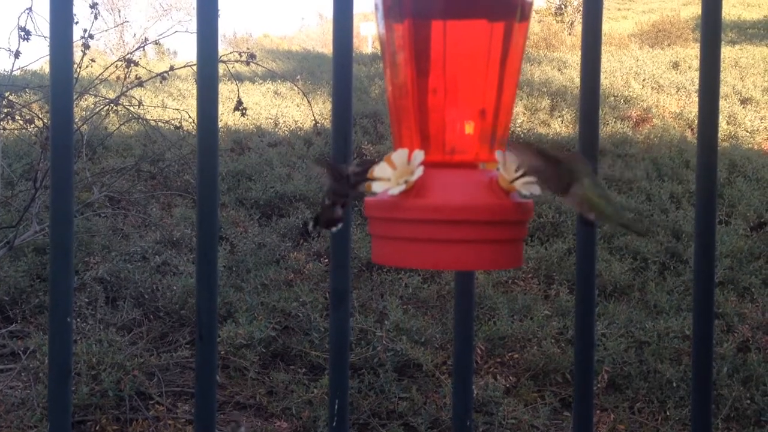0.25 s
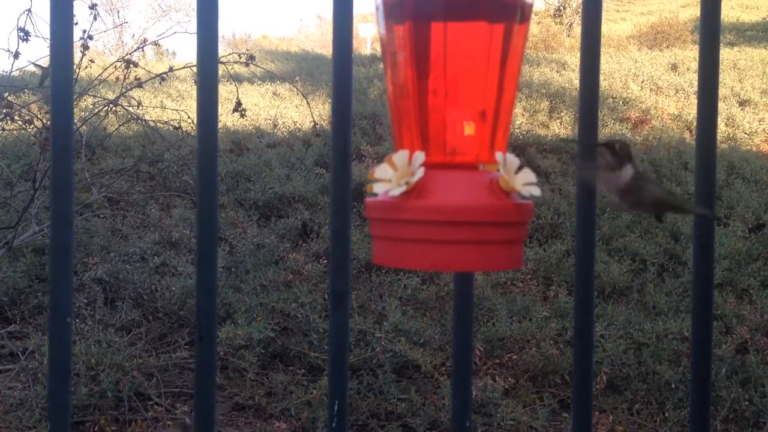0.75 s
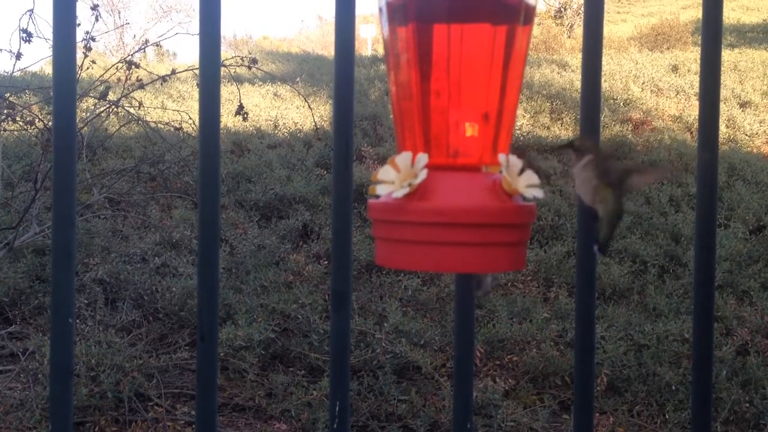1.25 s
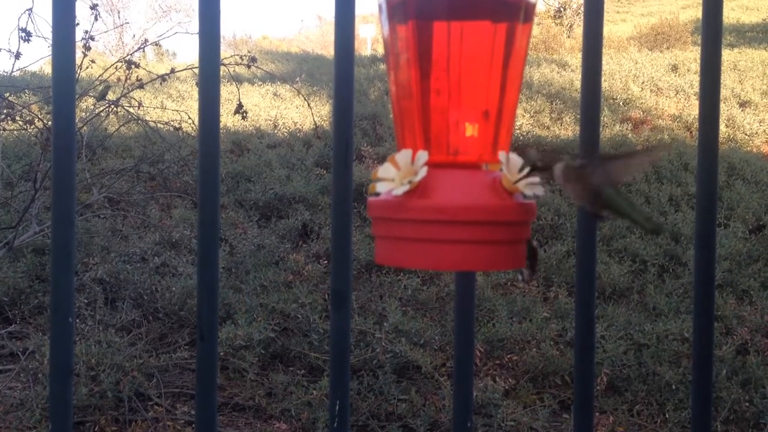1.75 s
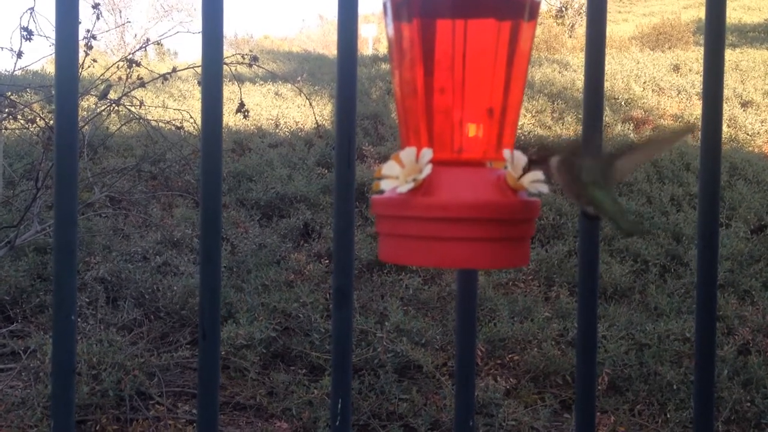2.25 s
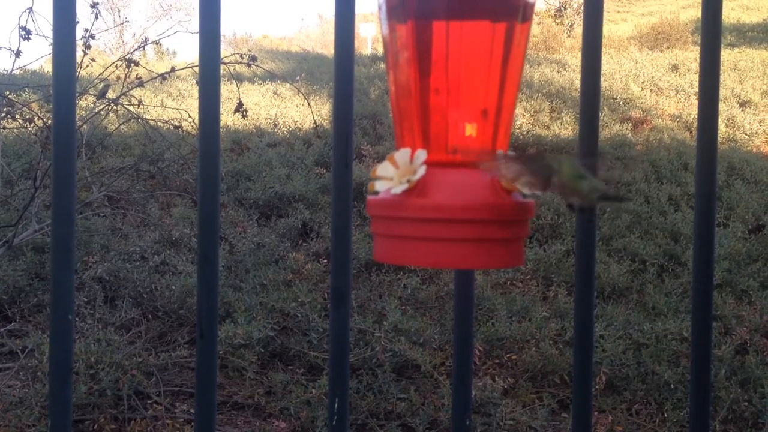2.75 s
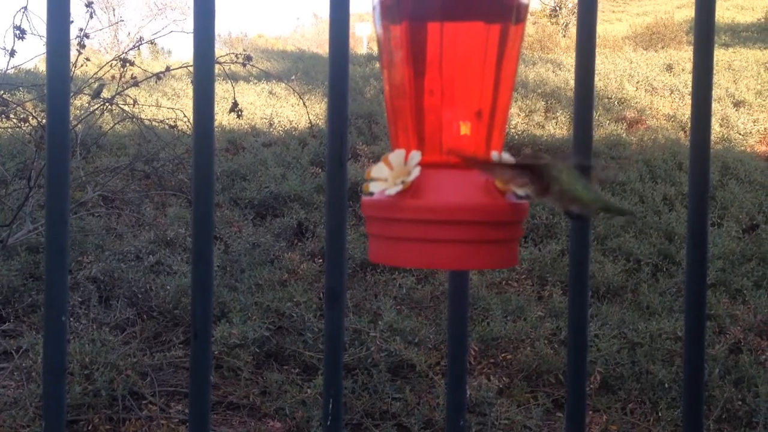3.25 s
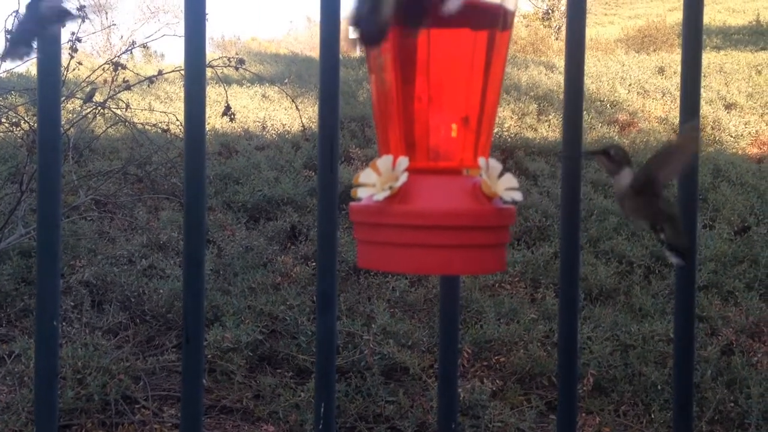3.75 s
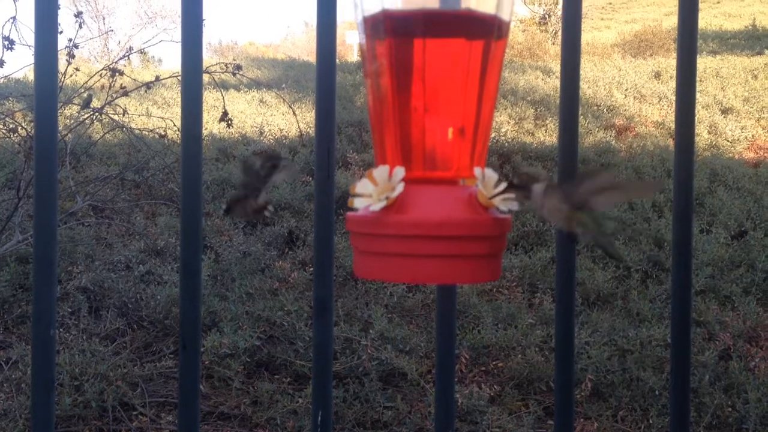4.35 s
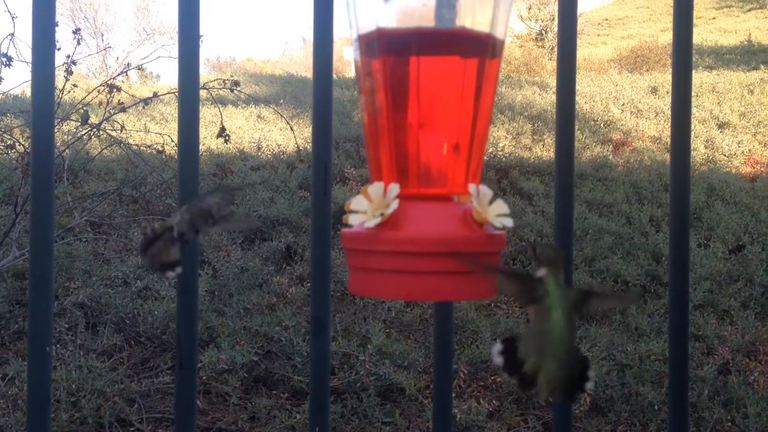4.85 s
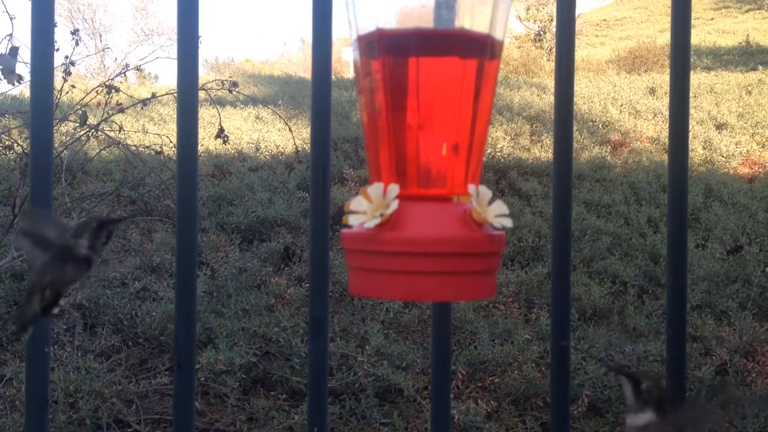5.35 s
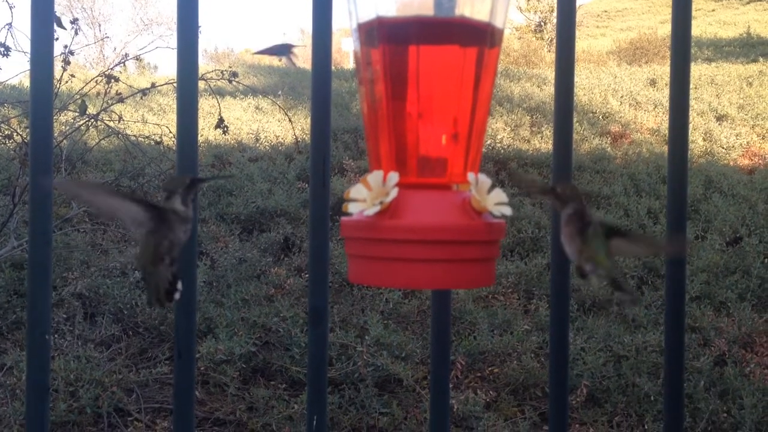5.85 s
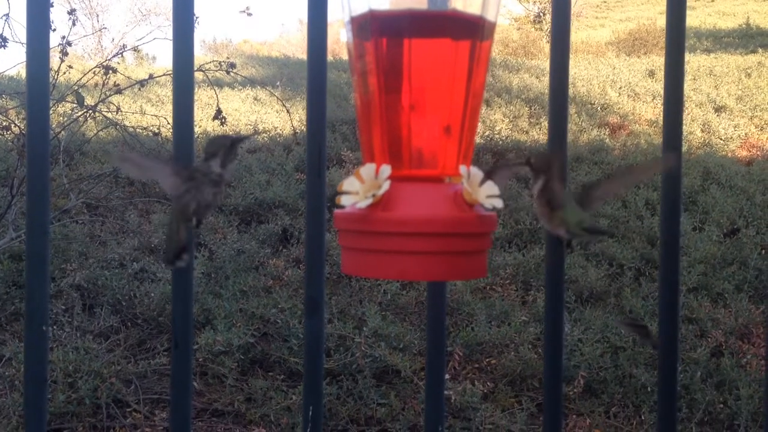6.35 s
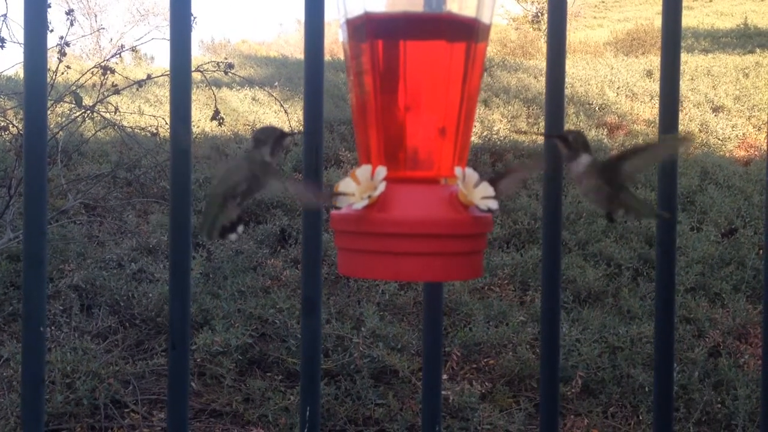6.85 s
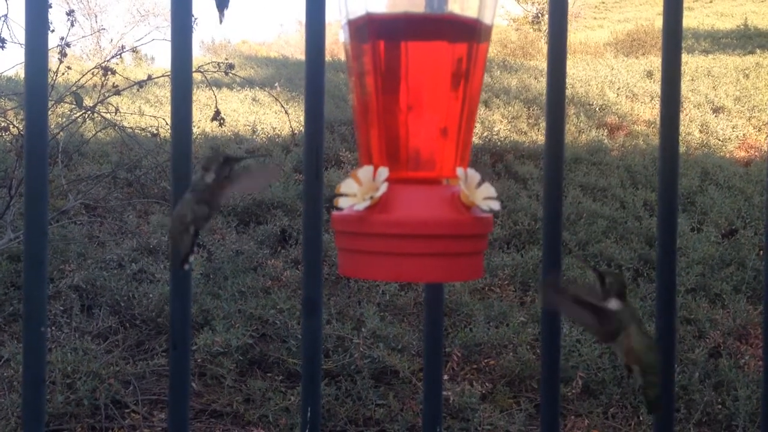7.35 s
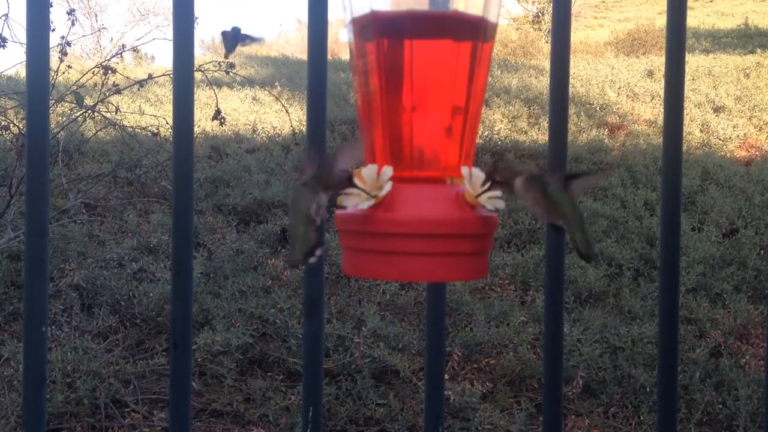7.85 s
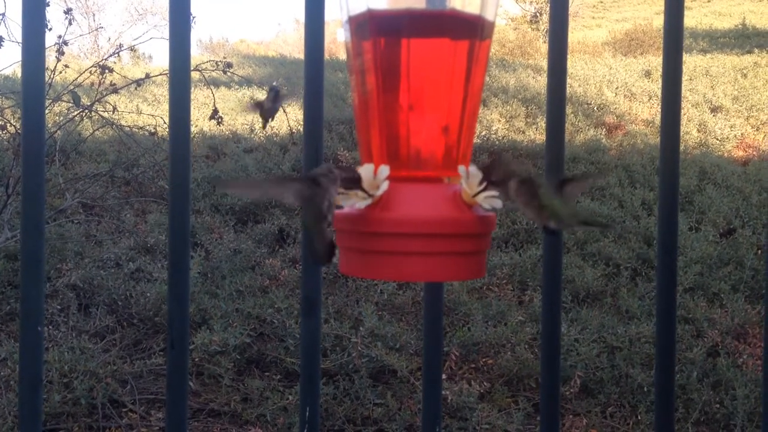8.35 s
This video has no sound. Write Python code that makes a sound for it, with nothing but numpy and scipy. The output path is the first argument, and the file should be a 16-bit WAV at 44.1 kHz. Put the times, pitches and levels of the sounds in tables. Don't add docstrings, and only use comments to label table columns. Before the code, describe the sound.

A close outdoor phone pickup of hummingbirds at a feeder, over faint garden hiss. Throughout, two low wing hums, roughly 40 and 50 beats per second, purr and swell unevenly with soft downwash and feather rustle. A tiny high warble opens at 0.1 s; a chip and wing thumps come near 0.7. From 1 to 3 s, faint warbles, little reedy scolds and sparse rising chips. At 3.6-3.75 heavy braking thuds, sharp ticks and chips, then a rapid piercing trill at 4.0 with a faint buzz. More chips and flutters until a second trill at 5.1, a louder raspy buzz at 5.24 and falling, brassy chatter from 5.4 to 5.8 amid the strongest wing thumps. Bright warbles and shivering twitters follow at 6.0-6.7, a chip at 6.85, flutters around 7.2-7.5, then chips to 7.85 and faint scolds and distant calls over softening hum until 8.6. Calls leave a short bright echo.

```python
import sys
import numpy as np
from scipy import signal
from scipy.fft import rfft, irfft
from scipy.io import wavfile
from scipy.ndimage import uniform_filter1d, minimum_filter1d

SR = 44100
rng = np.random.default_rng(int(sys.argv[2]) if len(sys.argv) > 2 else 0)


def boost_factor(decibels):
    exponent = np.asarray(decibels, float) / 20
    return 10 ** exponent


def put_to_file(sound):
    columns = np.atleast_2d(sound).T
    safe = np.clip(columns, -1, 1)
    whole_steps = np.round(safe * 32767)
    wavfile.write(sys.argv[1], SR, whole_steps.astype(np.int16))


N = 379701

# (time [s], stroke rate [Hz], hum level [dB])
QUICK_WINGS = [(0, 48.3, -57), (.62, 52.8, -55), (.78, 44.2, -47.5), (.95, 54.8, -59), (2, 49.2, -58),
               (2.4, 56.5, -54), (3.5, 48.5, -62.5), (3.65, 51, -62), (4.35, 50, -55.5), (4.48, 50, -56),
               (4.65, 51, -73), (5.25, 54.4, -53.5), (5.6, 49, -57.5), (6.8, 46, -65.5), (7.4, 51, -52),
               (7.6, 50.3, -58), (8.15, 52, -58), (8.61, 48.3, -59.5)]
SLOW_WINGS = [(0, 42.23, -64.5), (.3, 40.73, -54), (.5, 42.24, -60), (1.2, 44.98, -58.5),
              (2.3, 42.11, -60.5), (3.3, 40.44, -53), (3.52, 41.07, -57.5), (3.65, 43, -45),
              (4, 40.36, -52.5), (4.62, 38.03, -54), (4.9, 39.96, -52.5), (5.25, 44.42, -47),
              (5.7, 43.34, -59.5), (6.3, 42.52, -53), (7, 40.89, -57), (7.2, 45.4, -52), (7.45, 45.86, -63),
              (8.61, 43.16, -68)]
QUICK_PARTIALS = [-13, -4.5, -2.5, -4, -11.5, -15, -17, -19, -25, -21.5, -24.5, -30]
SLOW_PARTIALS = [-11.5, -0.5, -5, -4, -9.5, -17, -25, -21, -27.5, -33]
# (time [s], level [dB])
STIR = [(0.0, -70.5), (0.6, -69), (1.34, -75), (2.54, -71), (3.55, -74), (3.67, -66.5), (4.41, -72.5),
        (4.77, -72.5), (5.32, -62.5), (5.51, -64.5), (5.7, -73.5), (6.88, -73), (7.18, -69.5),
        (7.45, -65.5), (7.7, -77), (8.08, -69), (8.61, -76.5)]
# (frequency [Hz], level [dB])
WASH_COLOUR = [(25, -18), (40, -5), (60, 2.5), (100, 5), (200, 2.5), (300, -6), (450, -9.5), (700, -23),
               (1200, -44.5)]
# (frequency [Hz], level [dB])
RUSTLE_COLOUR = [(500, -2), (900, 2), (2000, 0), (2750, -6), (3700, -0.5), (6000, -10), (12000, -14)]
# (frequency [Hz], density [dB per Hz])
GARDEN_COLOUR = [(180, -35), (300, 0.5), (366, -4.5), (697, -18), (1000, -13.5), (1140, -14.5), (1670, -12),
                 (2750, -20.5), (3640, -16), (8190, -18.5), (11000, -20), (14600, -19.5), (15600, -23)]
# (time [s], length [s], centre [Hz], level [dB])
FAR_CALLS = [(0.0, 0.013, 7840, -56.5), (0.178, 0.046, 6550, -58.5), (0.263, 0.021, 6540, -58),
             (0.588, 0.0042, 3980, -59), (1.188, 0.037, 3500, -64), (1.493, 0.0066, 3960, -60.5),
             (2.736, 0.016, 6500, -60), (2.903, 0.015, 6510, -60), (3.144, 0.011, 5945, -56.5),
             (3.238, 0.019, 5270, -60), (3.303, 0.028, 6500, -61), (3.375, .015, 6000, -63.5),
             (3.617, 0.0078, 3980, -64), (3.742, 0.0045, 4000, -53), (3.744, .0015, 3500, -45.5),
             (4.004, .0015, 4000, -52), (3.752, .0015, 3300, -57), (.005, .0015, 3700, -54),
             (1.373, 0.0013, 3800, -54), (1.386, .0012, 3800, -56), (1.405, .0012, 4200, -60),
             (6.43, .0012, 3800, -60), (6.451, .0012, 3800, -59), (6.47, .0012, 3800, -58),
             (7.188, 0.0014, 3700, -52), (7.2, .0015, 3900, -60), (7.22, .0015, 3700, -57),
             (7.286, .0012, 4100, -60), (3.799, 0.0036, 4000, -53), (3.817, .004, 4020, -59),
             (5.086, 0.0035, 2600, -50), (5.176, 0.0048, 3600, -45), (4.824, 0.023, 3000, -60),
             (5.643, .0012, 3800, -48), (5.664, .0012, 3800, -53), (6.896, 0.0077, 4500, -55.5),
             (7.165, 0.042, 3690, -58.5), (7.166, 0.0089, 3350, -54.5), (7.21, 0.0089, 3700, -59),
             (7.523, 0.011, 3715, -64), (7.164, 0.035, 1908, -57), (7.617, 0.027, 7000, -61.5),
             (8.013, 0.038, 5995, -59), (8.076, 0.031, 6900, -57), (8.137, 0.034, 7000, -69),
             (8.233, 0.059, 6490, -63.5)]
# (time [s], length [s], one swing [s], top [Hz], level [dB])
WARBLES = [
    (0.08, 0.024, 0.024, 10510, -35),
    (2.377, 0.022, 0.023, 10570, -41),
    (1.61, 0.099, 0.022, 11040, -47),
    (2.204, 0.083, 0.023, 10980, -44),
    (6.036, 0.0792, 0.0236, 11230, -31),
    (6.5593, 0.033, 0.027, 10900, -32),
    (6.679, 0.037, 0.025, 10810, -30.5),
]
# (time [s], length [s], from [Hz], to [Hz], level [dB])
CHIPS = [(0.685, 0.01, 5430, 8850, -33.5), (1.357, 0.016, 5300, 10350, -41),
         (1.796, 0.015, 5670, 9600, -50.5), (2.293, 0.01, 7000, 8610, -51.5),
         (2.662, 0.012, 6200, 9720, -40.5), (2.947, 0.013, 5840, 8940, -42),
         (3.097, 0.013, 5200, 9060, -38.5), (3.636, 0.011, 5860, 9240, -45.5),
         (3.7843, 0.0091, 5735, 8700, -39), (3.916, 0.016, 5474, 9280, -34),
         (4.3282, 0.014, 5215, 9280, -34), (4.475, 0.011, 5370, 8950, -33),
         (4.91, 0.011, 5364, 8830, -35.5), (5.041, 0.011, 5290, 8975, -33.5),
         (5.939, 0.014, 5530, 9480, -32.5), (6.126, 0.006, 6590, 8700, -40),
         (6.844, 0.011, 6170, 9426, -32.5), (7.386, 0.014, 5300, 10010, -34),
         (7.8453, 0.0084, 5795, 8590, -38.5)]
# (time [s], peak level [dB], frequency [Hz])
FLAPS = [(.739, -33, 119), (0.76, -31, 119), (0.776, -30, 140), (.796, -30.5, 202), (0.836, -37.5, 109.9),
         (2.281, -33, 172), (2.385, -31, 100), (3.605, -24.5, 94.8), (3.628, -32, 110), (3.64, -26.5, 129),
         (3.659, -25.5, 215), (3.678, -27, 222), (3.699, -30, 224), (3.792, -43, 900), (7.208, -44, 800),
         (3.729, -23.5, 150), (3.75, -26.5, 160), (3.933, -36, 99.8), (4.206, -35, 120),
         (4.445, -32, 202.3), (4.465, -29.5, 200), (4.486, -32, 222), (4.506, -38, 201.5),
         (4.759, -38, 119.5), (4.867, -30.5, 199), (4.889, -28.5, 168), (5.071, -38, 130),
         (5.165, -27, 194), (5.186, -30.5, 142), (5.206, -37, 109.7), (5.231, -33, 141.3),
         (5.286, -30.5, 100), (5.297, -32, 130.6), (5.337, -29, 151), (5.414, -34, 179.8),
         (5.557, -23, 143), (5.572, -21, 296.4), (5.608, -24, 175.4), (5.811, -24, 258.3),
         (5.845, -34.5, 199.8), (5.887, -37, 170.6), (5.902, -29, 149.8), (5.966, -38, 150.8),
         (6.361, -33.5, 64.8), (6.375, -35.5, 198.9), (7.189, -35, 167.3), (7.215, -33, 170),
         (7.376, -46, 805), (7.396, -47, 796), (7.417, -43, 951), (7.438, -42, 1001), (7.459, -39.5, 950),
         (7.48, -45, 900)]
# (time [s], length [s], from [Hz], to [Hz], level [dB])
SCOLDS = [
    (1.049, 0.024, 1960, 1497, -54.5),
    (2.248, 0.022, 1940, 1435, -56),
    (2.268, 0.025, 1900, 1594, -53),
    (4.54, 0.025, 1977, 1586, -53.5),
    (4.825, 0.025, 2390, 1630, -61.5),
    (5.28, 0.024, 1905, 1475, -53.5),
    (7.553, 0.022, 2170, 1446, -60),
]
# (time [s], length [s], from [Hz], to [Hz], level [dB])
SCOLDS_AWAY = [(1.19, 0.015, 1895, 1688, -58), (1.213, 0.0095, 2000, 1900, -61),
               (1.496, 0.011, 1789, 1760, -67), (2.062, 0.026, 2450, 1534, -59),
               (3.618, .011, 2500, 1500, -63), (2.703, 0.021, 2440, 1583, -52),
               (6.533, 0.011, 2335, 1584, -58), (6.903, 0.034, 1944, 1462, -59),
               (7.381, 0.0108, 2240, 1770, -56), (7.666, 0.018, 2240, 1646, -57.5),
               (7.887, 0.012, 2570, 1651, -59.5), (8.498, 0.017, 2298, 1721, -57.5)]
# (frequency [Hz], level [dB])
THROAT = [(1300, -5), (2300, 7.5), (2900, -2), (3900, 4), (5600, 4.5), (7700, -2), (10000, -13.5),
          (15000, -16)]
# (time [s], dip [Hz], level [dB])
TRILLS = [
    [(3.986, 6850, -32), (3.9995, 6230, -28), (4.0119, 5490, -29.5), (4.0251, 5020, -33),
     (4.0381, 5670, -30.5), (4.0496, 5560, -33.5), (4.0646, 5030, -35.5), (4.0798, 5600, -36),
     (4.0955, 5810, -42), (4.102, 5930, -51)],
    [(5.0642, 6550, -45), (5.0745, 5100, -37), (5.0869, 6146, -39.5), (5.1012, 5500, -32),
     (5.1141, 5350, -31.5), (5.1271, 4900, -31.5), (5.1401, 4807, -32), (5.1528, 4085, -34),
     (5.1658, 4100, -37.5), (5.18, 2870, -48), (5.184, 5900, -62), (5.1915, 5900, -47), (5.197, 3500, -55)],
]
# (frequency [Hz], level [dB])
TRILL_RASP = [(7800, -40), (8800, -4), (13400, 5), (14000, -40)]
# (time [s], length [s], from [Hz], to [Hz], swing [Hz], level [dB])
BUZZES = [
    (4.1, 0.045, 5780, 4670, 930, -46),
    (5.238, .047, 4980, 4300, 1240, -35.5),
]
BUZZ_AIR_DB = [-13, -5]
# (time [s], length [s], from [Hz], pause [1 none - 6 long], level [dB])
CHATTER_HOOKED = [
    (5.371, 0.032, 4554, 3, -42),
    (5.678, 0.028, 4420, 1.5, -50),
    (5.777, 0.03, 4100, 1.4, -47),
]
# (time [s], length [s], from [Hz], pause [1 none - 6 long], level [dB])
CHATTER = [
    (5.438, 0.031, 4300, 5, -43.5),
    (5.510, 0.032, 4700, 1.7, -44),
    (5.588, 0.033, 4150, 4, -47.5),
]
# (frequency [Hz], level [dB])
BEAK = [(1500, 0), (1950, 2), (2350, 12), (2800, -3), (3700, 6), (5600, 9), (7400, 7), (9500, -4),
        (15000, -21)]
# (time [s], rise [s], from [Hz], shiver [s], level [dB])
TWITTERS = [
    (6.2197, 0.0074, 5124, 0.01693, -33.5),
    (6.315, 0.0074, 8260, 0.0107, -30),
]

OCTAVE_DB, ROUGH_DB = -27, 1.5
TOP_THIN_DB, LOW_THIN_DB = -2.5, -11.5
SWEEP_HZ_PER_S, TOP_SAG_HZ_PER_S = 200500, 5000
RISE_SHARE, LAST_REACH = 0.63, 0.66
SLOW_SWING_S = 0.0225
FIRST_LEAN, FIRST_DELAY = 0.256, 1.45
WARBLE_START_DB, FALL_DB, LAST_DB = -13, -5.5, -5
ROUGH_PER_DB = 0.1086
FULL_VOICE_HZ, WEAK_DB_PER_KHZ, CHIP_OCTAVE_DB = 7000, 9, -15.5
HELD_HZ, HELD_SAG_HZ, HELD_SAG_S = 6714, 700, 0.0147
HOOK_HZ, FALL_HZ_PER_S, PAUSE_HZ, END_HZ = 3850, 182000, 1880, 1380
OPEN_DB, OPEN_SHARE, CLOSE_DB = -9, 0.35, -2
TURNS_S, TURN_DB_PER_S = 5.59, -21
SHIVER_S, SHIVER_HZ, SHIVER_SWING_HZ, SHIVER_END_HZ = 0.00235, 9280, 356, 8310
SHIVER_ARCH_HZ, TWITTER_START_DB, SHIVER_FADE_DB_PER_S = 694, -21, 250
SHADOW_DB, HIGH_SHADOW_DB, HIGH_HZ, REACH_BINS = 21, 15, 11000, 101


def shape(points, hz):
    f, db = np.transpose(points)
    return boost_factor(np.interp(np.log(np.maximum(hz, 1)), np.log(f), db))


def noise(points):
    spectrum = rfft(rng.standard_normal(N + 1))
    x = irfft(spectrum * shape(points, np.fft.rfftfreq(N + 1, 1 / SR)))[:N]
    return x / x.std()


def walk(rate):
    k = int(SR / rate)
    held = np.repeat(rng.standard_normal(N // k + 1), k)
    x = uniform_filter1d(uniform_filter1d(held, k), k)[:N]
    return x / x.std()


def curve(table):
    s, *columns = np.transpose(table)
    return [np.interp(np.arange(N) / SR, s, c) for c in columns]


def add(out, s, x, attack=0.0011, release=0.0016):
    t = np.arange(len(x)) / SR
    i = int(max(s, 0) * SR)
    edges = np.clip(np.minimum(t / attack, (t[-1] - t) / release), 0, 1)
    out[i:i + len(x)] += (x * edges)[:N - i]


def whistle(hz, db, octave_db):
    phase = 2 * np.pi * np.cumsum(hz) / SR
    second = boost_factor(octave_db) * (hz < 9500) * np.sin(2 * phase)
    third = boost_factor(-38) * np.sin(3 * phase)
    return np.sqrt(2) * boost_factor(db) * (np.sin(phase) + second + third)


def swing(s, hz, db, rough, creep=False):
    turns = np.arange(len(s))
    step = np.interp(np.arange(s[0], s[-1], 1 / SR), s, turns)
    k, u = step.astype(int), step % 1
    way = (1 - np.cos(np.pi * u)) / 2
    if creep:
        shoot = (1 - np.cos(np.pi * u ** FIRST_DELAY)) / 2
        way = np.where(k, way, FIRST_LEAN * u + (1 - FIRST_LEAN) * shoot)
    pitch = np.interp(k + way, turns, hz)
    thin_db = np.where(np.round(step) % 2, TOP_THIN_DB, LOW_THIN_DB) * np.cos(np.pi * u) ** 2
    level = np.interp(step, turns - 0.35, db) + thin_db
    return whistle(pitch, level + ROUGH_DB * rough[:len(u)], OCTAVE_DB)


def wings(table, partials, wobble, uneven_db):
    hz, db = curve(table)
    phase = 2 * np.pi * np.cumsum(hz * (1 + wobble * walk(25))) / SR
    hum = sum(boost_factor(g) * np.cos((k + 1) * phase + 0.7 * k + 0.2974 * k ** 2) for k, g in enumerate(partials))
    level = db + uneven_db * walk(40) + 2.0 * walk(7.9)
    return np.sqrt(2) * boost_factor(level) * hum, phase


def downwash(braking, beat):
    hover = np.hypot(boost_factor(curve(QUICK_WINGS)[1]), boost_factor(curve(SLOW_WINGS)[1]))
    steady = boost_factor(-2) * hover * (hover / boost_factor(-52.5)) ** 0.13
    gust = boost_factor(-7) * np.sqrt(np.abs(uniform_filter1d(braking ** 2, size=int(0.042 * SR))))
    air = np.minimum(np.hypot(steady, gust), boost_factor(-46.5))
    return air * boost_factor(1.5 + 2.0 * beat + 2.55 * walk(30)) * noise(WASH_COLOUR)


def rustle(beat):
    level = curve(STIR)[0] + 4.5 + 2.5 * beat + 2.9 * walk(60)
    return boost_factor(level) * noise(RUSTLE_COLOUR)


def garden():
    return boost_factor(-64 + 0.75 * walk(1.63)) * noise(GARDEN_COLOUR)


def far_birds():
    out = np.zeros(N)
    hiss, rasp = rng.standard_normal(N), boost_factor(3.0 * walk(250))
    for s, length, hz, db in FAR_CALLS:
        width_hz = hz * (1.4 if 0.002 < length < 0.009 else 0.54)
        i, n = int(max(s, 0) * SR), int(length * SR) + 200
        limits = [max(hz - width_hz / 2, 300), hz + width_hz / 2]
        band = signal.butter(2, limits, "band", fs=SR, output="sos")
        x = signal.sosfilt(band, hiss[i:i + n]) * rasp[i:i + n]
        add(out, s, boost_factor(db) * x / x.std(), 0.003, 0.005)
    return out


def warbles():
    out, rough = np.zeros(N), walk(600)
    for s, length, period, top_hz, db in WARBLES:
        k = np.arange(round(2 * length / period) + 1)
        up, span = k % 2, SWEEP_HZ_PER_S * period
        t = np.append((period * (k // 2 + RISE_SHARE * up))[:-1], length)
        hz = top_hz - span * (1 - up) - TOP_SAG_HZ_PER_S * t * up
        hz[-1] = hz[-2] + LAST_REACH * (hz[-1] - hz[-2])
        level = db + FALL_DB * (1 - up) * (k < k[-1]) + WARBLE_START_DB * (k == 0)
        level = level + LAST_DB * (k == k[-1]) * (period > SLOW_SWING_S)
        depth = 1.5 - ROUGH_PER_DB * (db + 25.5) / 2
        add(out, s, swing(t, hz, level, depth * rough[int(s * SR):], creep=True))
    return out


def chips():
    out, rough = np.zeros(N), walk(700)
    for s, length, low_hz, top_hz, db in CHIPS:
        u = np.arange(0, 1.2, 1 / (length * SR))
        rise = np.sin(np.pi / 2 * u ** 1.57)
        start_db = WEAK_DB_PER_KHZ * (low_hz - FULL_VOICE_HZ) / 1000 - 3
        swell = start_db * np.clip(1 - u / 0.84, 0, 1) ** 1.44 - 14 * np.clip(u - 0.75, 0, 1)
        level = db + 0.5 + swell + 1.1 * rough[int(s * SR):][:len(u)]
        add(out, s, whistle(low_hz + (top_hz - low_hz) * rise, level, CHIP_OCTAVE_DB))
    return out


def flaps():
    out = np.zeros(N)
    for s, db, hz in FLAPS:
        cycles = np.arange(-1.5, 2.5, hz / SR)
        width = np.where(cycles < 0, 0.45, 0.8)
        pulse = np.sin(2 * np.pi * cycles) * np.exp(-(cycles / width) ** 2)
        add(out, s - 1.543 / hz, boost_factor(db - 2.5) * pulse)
    return out


def scolds():
    out = np.zeros(N)
    flutter, breath = np.array([walk(180) for _ in range(10)]), noise(THROAT)
    k = np.arange(1, 11)[:, None]
    for rows, upper_db in ((SCOLDS, 0), (SCOLDS_AWAY, -12.5)):
        for s, length, from_hz, to_hz, db in rows:
            u = np.arange(0, 1, 1 / (length * SR))
            here = slice(int(s * SR), int(s * SR) + len(u))
            pause = 0.035 * np.sin(2 * np.pi * u) - 0.04 * np.sin(3 * np.pi * u)
            slide = u + np.log(from_hz / to_hz) * pause
            hz = (1 + 0.015 * flutter[0, here]) / (1 / from_hz + (1 / to_hz - 1 / from_hz) * slide)
            phase = 2 * np.pi * np.cumsum(hz) / SR
            hollow_db = 4.5 if from_hz < 2050 else 1.5
            level = upper_db * np.clip(0.7 * k - 1.25, 0, 1) - hollow_db * (k == 2)
            level = level - (8.8 * u ** 2 + 0.83 * (1 - u) ** 2) * (k > 1) - 2 * (1 - u) ** 2 * (k == 1)
            level = level + np.minimum(1 + k, 4) * flutter[:, here]
            gain = shape(THROAT, k * hz) * boost_factor(level)
            voice = np.sqrt(2) * (gain * np.sin(k * phase)).sum(axis=0)
            breath_db = -1 if length < 0.0185 else upper_db / 2 - 11
            add(out, s, boost_factor(db + 2) * (voice + boost_factor(breath_db) * breath[here]), 0.006, 0.003)
    return out


def trills():
    out, rough = np.zeros(N), walk(360)
    for rows in TRILLS:
        s, dip_hz, db = np.transpose(rows)
        step = np.interp(np.arange(s[0], s[-1], 1 / SR), s, np.arange(len(s)))
        u = step % 1
        catch = np.exp(-u / 0.11) + np.exp(-(1 - u) / 0.14)
        held = HELD_HZ - HELD_SAG_HZ * np.exp(-np.arange(len(u))[::-1] / SR / HELD_SAG_S)
        pitch = held - 1.22 * catch * (held - dip_hz[np.round(step).astype(int)])
        level = db[(step + 0.12).astype(int)] + 1.0 * rough[:len(u)] - 3 * u - 1.9 * catch
        level -= 5 * (step > 1) * np.exp(-((u - 0.17) / 0.041) ** 2)
        level -= 9 * np.exp(-((u - 0.8) / 0.056) ** 2)
        octave_db = -17 + 0.3 * np.minimum(level + 38, 0) + 3 * catch + 3 * rough[::-1][:len(u)]
        note = whistle(uniform_filter1d(pitch, size=30), uniform_filter1d(level, size=40), octave_db)
        add(out, s[0], note, 0.0006)
    return out


def trill_rasp(trill):
    drive = np.sqrt(np.abs(uniform_filter1d(trill ** 2, size=400)))
    return boost_factor(-23) * drive * noise(TRILL_RASP)


def buzzes():
    out, rough = np.zeros(N), walk(900)
    hiss = noise([(2000, -38), (3500, 5.0), (9000, 1), (12000, -9), (15500, -21)])
    for (s, length, from_hz, to_hz, swing_hz, db), air_db in zip(BUZZES, BUZZ_AIR_DB):
        u = np.arange(0, 1, 1 / (length * SR))
        shake = np.cos(2 * np.pi * 229 * length * (u - 0.062 * u ** 3))
        fray = u ** 2 * rough[int(s * SR):][:len(u)]
        slide = (to_hz - from_hz) * u ** 2
        pitch = from_hz + slide + swing_hz * ((0.73 + 0.28 * u) * shake + 0.48 * fray)
        half = np.pi * np.cumsum(from_hz + 0.3 * slide + 0.3 * swing_hz * shake) / SR
        halves = boost_factor(db - 42 + 38 * u) * np.sin(half)
        halves += boost_factor(db - 15 + 5.2 * shake - 6 * u) * np.sin(3 * half)
        air = boost_factor(db + air_db * (1 - u) + 0.6 * shake) * hiss[int(s * SR):][:len(u)]
        note = whistle(pitch, db + 1.2 * shake - 3 * np.abs(fray), -13 + 5 * u)
        add(out, s, note + halves + air, 0.012, 0.006)
    return out


def chatter():
    out = np.zeros(N)
    flutter, breath = np.array([walk(180) for _ in range(10)]), noise(THROAT)
    k = np.arange(1, 11)[:, None]
    for rows, cap_hz in ((CHATTER_HOOKED, HOOK_HZ), (CHATTER, SR / 2)):
        for s, length, from_hz, pause, db in rows:
            u = np.arange(0, 1, 1 / (length * SR))
            here = slice(int(s * SR), int(s * SR) + len(u))
            fall = np.clip(from_hz - FALL_HZ_PER_S * length * u, 0, cap_hz)
            rest = END_HZ + (PAUSE_HZ - END_HZ) * (1 - u ** pause) / (1 - 0.65 ** pause)
            landing = (fall ** 9 + np.minimum(rest, 2350) ** 9) ** (1 / 9)
            hz = landing * (1 + 0.006 * flutter[0, here])
            turn_db = TURN_DB_PER_S * max(s - TURNS_S, 0)
            upper_db = OPEN_DB * np.clip(1 - u / OPEN_SHARE, 0, 1) + CLOSE_DB * u ** 5 + turn_db
            shy_db = turn_db * np.clip(1.5 - u / 0.25, 0, 1.2)
            level = (upper_db - 1.37 * k) * (k > 1) + shy_db + 3.2 * flutter[:, here]
            gain = shape(BEAK, k * hz) * (k * hz < 15500) * boost_factor(level)
            phase = 2 * np.pi * np.cumsum(hz) / SR
            voice = np.sqrt(2) * (gain * np.sin(k * phase)).sum(axis=0)
            add(out, s, boost_factor(db) * (voice + boost_factor(upper_db - 4.0) * breath[here]), 0.004, 0.004)
    return out


def twitters():
    out, rough = np.zeros(N), walk(600)
    for s, rise, from_hz, length, db in TWITTERS:
        k = np.arange(round(length / SHIVER_S) + 1)
        t = k * length / k[-1]
        arch = SHIVER_ARCH_HZ * np.sin(np.pi * t / length) * (1 - k % 2)
        shiver = SHIVER_HZ + SHIVER_SWING_HZ * (-1) ** k + arch
        hz = np.r_[from_hz, shiver[:-1], SHIVER_END_HZ]
        level = db + np.r_[TWITTER_START_DB, -SHIVER_FADE_DB_PER_S * np.abs(t - length / 3)]
        add(out, s, swing(np.r_[0, rise + t], hz, level, rough[int(s * SR):]))
    return out


def echo(x):
    t = np.arange(int(0.15 * SR)) / SR
    decay = boost_factor(-60 * t / 0.075)
    tail = rng.standard_normal(len(t)) * np.clip(t / 0.0034, 0, 1) * decay
    near = np.sqrt(uniform_filter1d(x ** 2, size=900) + boost_factor(-47.0) ** 2) / boost_factor(-31.0)
    return boost_factor(-16.5) * signal.fftconvolve(x * near ** -0.65, tail / np.sqrt(np.sum(tail ** 2)))[:N]


def scene():
    quick, phase = wings(QUICK_WINGS, QUICK_PARTIALS, 0.0199, 2.9)
    slow, _ = wings(SLOW_WINGS, SLOW_PARTIALS, 0.025, 3.53)
    beat = np.cos(phase)
    braking = flaps()
    flight = quick + slow + braking + downwash(braking, beat) + rustle(beat)
    trill = trills()
    voices = far_birds() + warbles() + chips() + scolds() + trill + buzzes() + chatter() + twitters()
    return (flight + garden() + voices + echo(voices) + trill_rasp(trill))[None]


def mask(x):
    hz, _, z = signal.stft(x, SR, nperseg=2048, noverlap=1536)
    hz = hz[:, None]
    db = 10 * np.log10(uniform_filter1d(np.abs(z) ** 2, size=30, axis=1) + 1e-18)
    # 8 per kHz, then 4
    slope = (8 * np.minimum(hz, HIGH_HZ) + 4 * np.maximum(hz - HIGH_HZ, 0)) / 1000
    loud = np.roll(np.where(hz > 5000, db + slope, -200), 1, axis=2)
    highest = -minimum_filter1d(-loud, size=REACH_BINS, axis=1, origin=REACH_BINS // 2)
    shadow = highest - slope
    hidden = db < shadow - np.where(hz > HIGH_HZ, HIGH_SHADOW_DB, SHADOW_DB)
    return signal.istft(z * np.where(hidden, 0.06, 1), SR, nperseg=2048, noverlap=1536)[1][:, :N]


def band_limit(x):
    return signal.sosfilt(signal.butter(12, 15940, fs=SR, output="sos"), x)


def record(dry):
    top_cut = signal.ellip(10, 0.2, 70, 15450, fs=SR, output="sos")
    mix = mask(signal.sosfilt(top_cut, dry))
    return band_limit(mix)


dry = scene()
out = record(dry)
put_to_file(out)
```